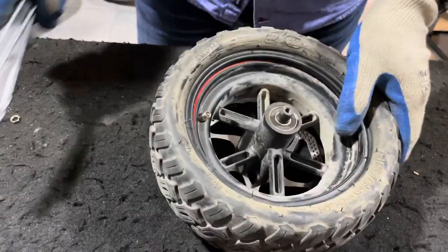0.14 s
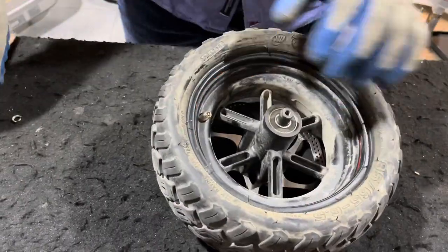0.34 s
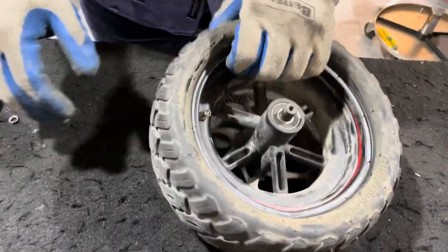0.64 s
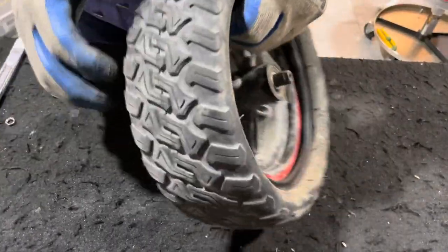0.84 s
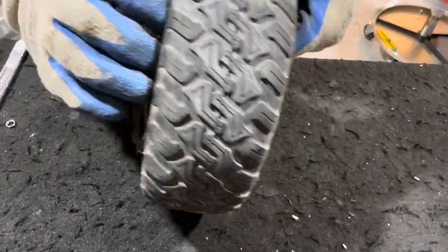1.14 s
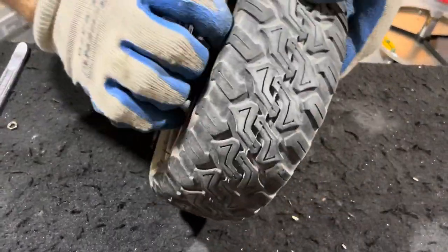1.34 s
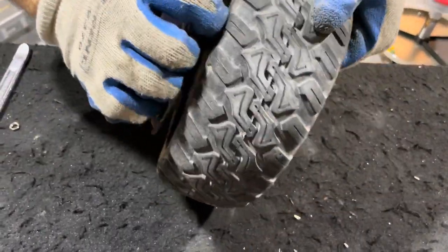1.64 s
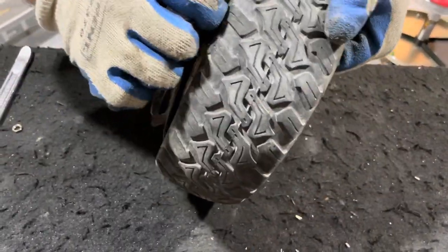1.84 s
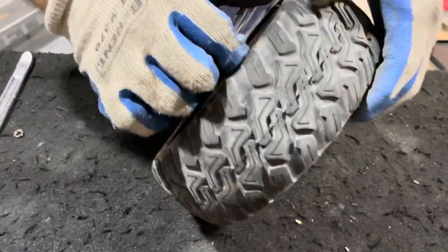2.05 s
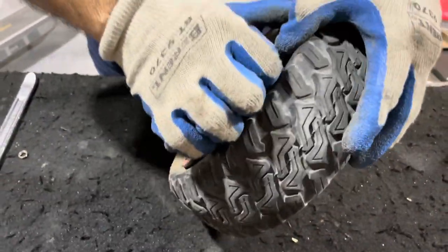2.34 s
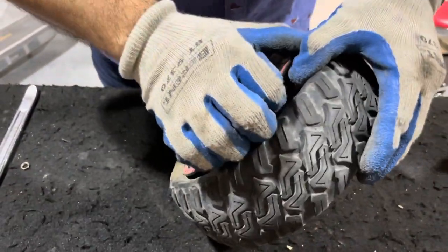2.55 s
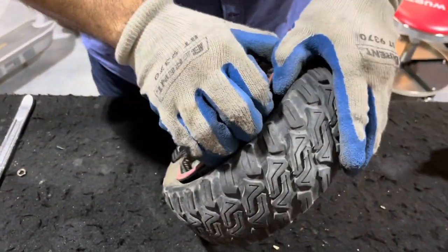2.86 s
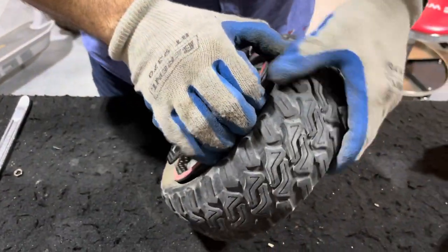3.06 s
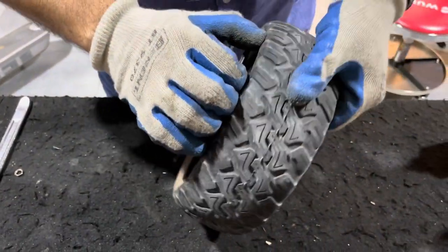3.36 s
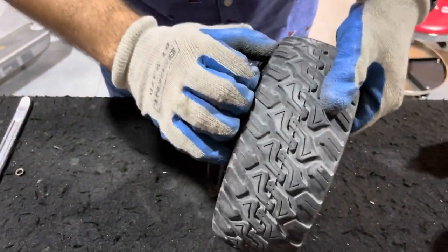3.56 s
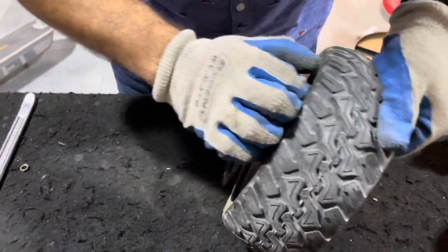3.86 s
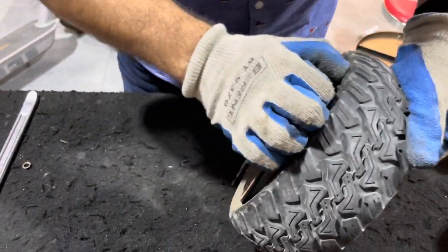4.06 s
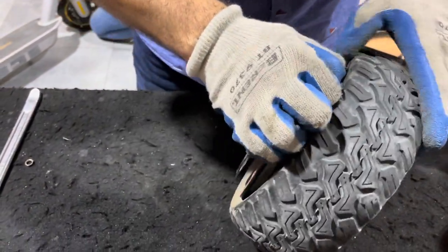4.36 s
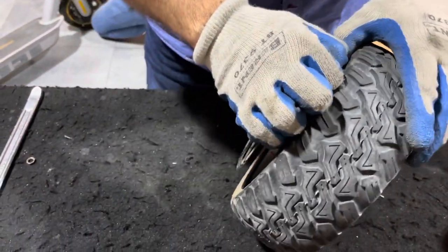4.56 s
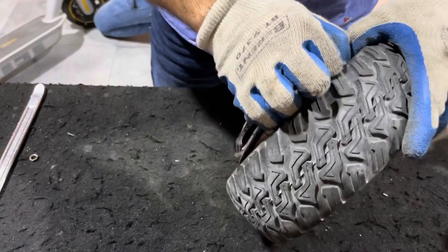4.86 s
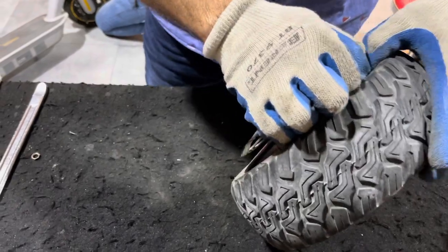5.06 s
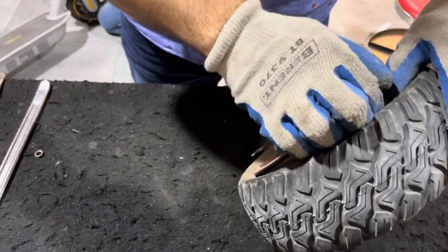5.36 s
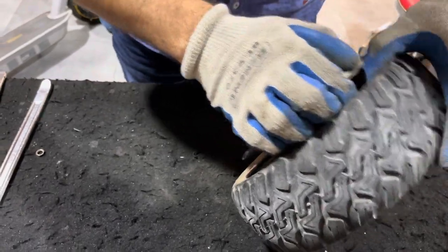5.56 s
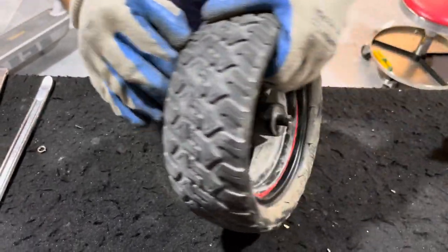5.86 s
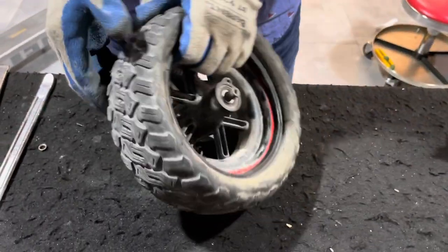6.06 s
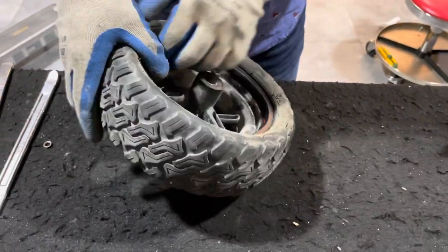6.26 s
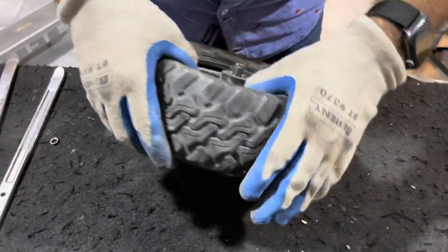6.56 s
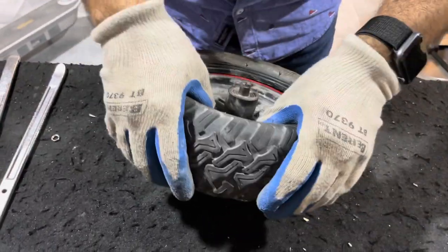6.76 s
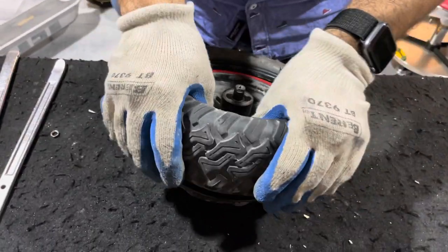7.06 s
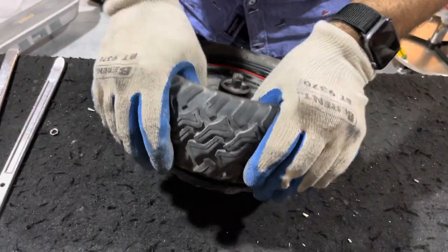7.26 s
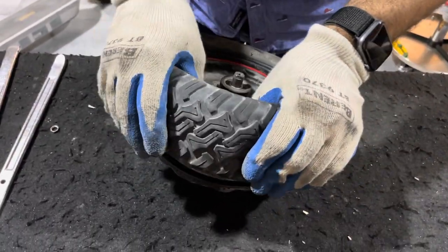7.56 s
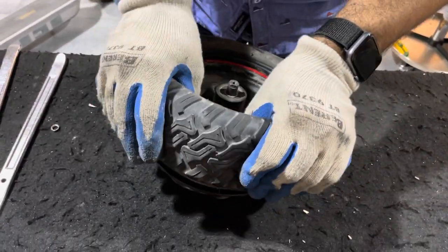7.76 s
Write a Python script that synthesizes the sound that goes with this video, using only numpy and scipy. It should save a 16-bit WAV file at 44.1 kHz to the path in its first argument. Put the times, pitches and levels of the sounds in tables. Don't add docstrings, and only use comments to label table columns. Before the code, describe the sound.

Close up at a workbench, metal tire levers tap lightly and land in a hard, ringing clatter within the first half second. Then a small tire is wrestled by gloved hands: faint rubbing, dry ticks, a knocking double pop, a weaker pop with a faint metallic ring. The last seconds bring muffled stand bumps, rubber creaks and squeaks, over dull room hum and short reverberation.

```python
import sys
import numpy as np
from scipy import signal
from scipy.fft import rfft, irfft, next_fast_len
from scipy.io import wavfile
from scipy.ndimage import uniform_filter1d, map_coordinates

SR = 44100
rng = np.random.default_rng(int(sys.argv[2]) if len(sys.argv) > 2 else 0)


def master(y):
    cut = np.clip(np.atleast_2d(y).T, -1, 1)
    pcm = np.round(cut * 32767)
    wavfile.write(sys.argv[1], SR, pcm.astype(np.int16))


def amplitude_ratio(level_db):
    exponent = np.asarray(level_db, float) / 20
    return 10 ** exponent


N = 348831

# t/s, level/dB
HUM_LEVEL = [(0, -49), (.13, -42.5), (.33, -44), (.48, -58), (.72, -42.5), (.86, -46.5), (1.05, -51.5),
             (5.7, -53), (7.91, -50.5)]
# f/Hz, level/dB
HUM_SPECTRUM = [(20, -16.5), (40, -5.5), (80, -2), (125, -6.5), (170, 1), (250, -11), (500, -15),
                (1000, -19), (2000, -30.5), (4000, -38.5), (8000, -48), (14000, -53.5)]
LEVER_HZ = [1860, 2993, 3047, 3133, 4543, 5490, 5717, 5857, 6212, 6330, 6446, 8118, 8225, 8410, 8516, 8602,
            9000, 9087, 10432, 10637, 11272, 11477, 12780, 12952, 13167, 14340, 14610, 15557]
# level/dB, T60/s
LEVER_MODES = [(-36, 1.8), (-27, 1.5), (-22, 1.8), (-14.5, 3.3), (-6, 0.9), (-14.5, 0.71), (-17.5, 1.12),
               (-24.5, 1.), (-6, 0.55), (-2, .45), (-14, 0.31), (2.5, 0.28), (-4, 0.65), (-14, 0.52),
               (-6, 0.8), (-16.5, .55), (-19.5, 1.2), (-21.5, 2.1), (-4.5, 0.5), (2, .5), (-14, 0.55),
               (-21, .7), (-20, 1.6), (-2, 0.45), (-16, .55), (-31, 0.46), (-24, .55), (-19, .62)]
# t/s, ring level/dB, crack level/dB, extra damping/(dB/s) by hand or mat, brightness/(dB/octave)
LEVER_CONTACTS = [(.001, -36.5, -29.5, 197.5, -1), (0.029, -39.5, -42, 201, -2.5),
                  (0.077, -50.5, -46.5, 69.5, -5), (0.1316, -44, -46.5, 297, -17),
                  (0.1466, -34.5, -26.5, 303, -14), (0.1845, -38, -43.5, 297.5, -8),
                  (0.2778, -43.5, -59.5, 102, -8), (0.3077, -26, -22, 300, -3),
                  (0.3324, -24, -32, 397.5, -0.5), (0.356, -15, -10.5, 499.5, -4),
                  (0.37, -18.5, -30, 400, 6.5), (0.385, -24.5, -20.5, 403.5, 3),
                  (0.394, -19.5, -34.5, 0, 1.3), (0.439, -22, -31.5, 142.5, 1.5),
                  (0.478, -28.5, -26, 208, 7.5)]
# f/Hz, level/dB
STRIKE_POINTS = [(3033, 13.5), (6370, 7.5), (13000, 8), (4540, 5), (6297, 9), (5400, 4), (6300, 1),
                 (8200, 4), (8200, 8.5), (6200, 4.5), (8400, 4.5), (8200, 1), (4540, -1.5), (6256, -1.5),
                 (8250, 2)]
# t/s, level/dB
GAIN_CONTROL = [(0, 5.5), (.385, 2), (.4, -2), (.49, 0), (.55, -5), (.76, 14), (1.5, 7.5), (1.6, -2.5)]
# t/s, length/s, level/dB
STEEL_SLIDES = [
    (0, 0.025, -29),
    (.149, 0.02, -38),
    (.311, 0.065, -27),
    (.358, 0.011, -28),
    (.47, 0.035, -58),
]
# t/s, level/dB, start f/Hz, T60/s, share through the stand (opposite in both ports, 0-1)
KNOCKS = [
    (0.355, -10.5, 240, 0.08, 0.02),
    (0.637, -30, 213, 0.099, 0.026),
    (1.572, -18, 420, 0.027, 0.086),
    (1.579, -13.5, 424, 0.013, 0.28),
    (3.269, -27, 348, 0.067, 0.62),
]
# t/s, level/dB
STAND_BUMPS = [(5.187, -39), (5.396, -49), (5.52, -43.5), (5.553, -34.5), (5.596, -40), (5.702, -48),
               (5.721, -41), (5.765, -36), (5.86, -43), (5.873, -41), (6.03, -44), (6.699, -45),
               (7.311, -39.5)]
# f/Hz, width/Hz, level/dB
BENCH_MODES = [(66, 21, -2), (148, 77, -2.5), (558, 79, -3), (1100, 340, -17)]
# f/Hz, T60/s
ROOM_DECAY = [(150, 0.05), (1000, 1), (4000, 0.67), (12000, 0.33)]
# t/s, length/s, level/dB
TREAD_DRAGS = [
    (.79, 0.037, -45),
    (1.9, 0.23, -58),
    (3.45, 0.44, -64),
    (4.7, 0.63, -59),
    (5.8, 0.76, -57),
    (6.55, .05, -53),
    (6.6, 2.6, -59),
]
# f/Hz, level/dB
DRAG_SPECTRUM = [(150, -24), (400, -2.5), (900, -7.5), (1800, -7.5), (3000, -10), (6000, -32.5)]
# t/s, peak level/dB, f/Hz
GRIT_TICKS = [(1.039, -50, 1590), (1.085, -65, 7000), (1.223, -54, 2500), (1.401, -48, 6100),
              (1.685, -53, 3070), (1.965, -48.5, 1770), (1.988, -49, 8000), (2.139, -42.5, 8990),
              (2.417, -53, 1453), (2.612, -50.5, 8980), (2.755, -58, 8700), (3.79, -58, 8100),
              (4.173, -51, 1853), (4.5412, -48.5, 1825), (5.04, -56, 1655), (5.159, -52.5, 1603),
              (5.289, -65.5, 7720), (5.65, -47, 1653), (5.875, -51, 12800), (6.12, -51, 1820),
              (6.713, -32.5, 2467), (6.716, -39, 4360), (7.094, -52, 6870), (7.278, -47.5, 7150),
              (7.555, -49, 8500)]
# t/s, length/s, swish level/dB, fizz level/dB
GLOVE_SLIPS = [(1.076, .02, -58, -73.5), (1.181, 0.89, -65.5, -67.5), (1.61, 0.11, -51.5, -86),
               (2.419, 0.049, -87, -80), (2.616, 0.044, -64, -76.5), (2.989, 0.076, -68, -74.5),
               (3.265, 0.082, -55, -67.5), (3.792, 0.49, -80.5, -68.5), (4.794, 0.019, -81.5, -79),
               (5.283, 0.072, -69.5, -83), (5.716, 0.1, -48.5, -71), (5.8, 0.13, -48, -76),
               (6.212, 0.18, -58, -69), (6.704, 0.11, -70, -71.5), (7.658, 0.09, -44, -68)]
# t/s, length/s, swish level/dB, fizz level/dB
GLOVE_RUBS = [(1.714, 0.25, -63, -69), (2.21, 0.025, -68.5, -62.5), (3.058, 0.011, -66, -64),
              (3.478, 0.036, -61.5, -65.5), (4.471, 0.018, -77, -71.5), (5.102, 0.079, -78, -71.5),
              (5.597, 0.072, -76.5, -64.5), (5.952, 0.1, -61.5, -91), (6.097, 0.073, -66.5, -65.5),
              (6.551, 0.17, -56.5, -68), (6.862, 0.13, -61, -87), (7.113, 0.23, -72.5, -75.5),
              (7.318, 0.14, -65.5, -79.5), (7.855, 0.15, -61, -74.5)]
# f/Hz, level/dB
SWISH_SPECTRUM = [(1200, -63), (2500, -2), (3700, -2.5), (4400, -3.5), (5250, 1), (6200, -5.5), (8000, -12),
                  (9500, -4), (11500, -53)]
# f/Hz, level/dB
FIZZ_SPECTRUM = [(1200, -5), (2500, 0), (5000, -4), (7500, -2.5), (10000, -1), (12500, -2), (14000, -20),
                 (16000, -17)]
# t/s, level/dB, slip length/s
FIRST_SNAP = [
    (1.5705, -19.5, 0.0046),
    (1.5775, -19.5, .003),
]
# f/Hz, width/Hz, level/dB
FIRST_RIM = [(588, 110, -6), (1176, 300, -7), (2667, 220, 0.5), (5060, 190, 3), (6430, 2300, -14.5),
             (12300, 1300, -23)]
# t/s, level/dB, slip length/s
SECOND_SNAP = [
    (3.2645, -24.5, 0.0036),
    (3.268, -24.5, 0.0034),
]
# f/Hz, width/Hz, level/dB
SECOND_RIM = [(504, 280, -8.5), (1420, 390, -6), (3100, 430, -14), (4360, 160, -2), (6080, 750, -11.5),
              (12400, 1200, -19.5)]
# f/Hz, level/dB, T60/s
WHEEL_MODES = [(4470, 0, .75), (5470, -1, .6), (6280, -8, .4), (6620, -5, .5)]
# t/s, length/s, f/Hz, level/dB
RUBBER_SQUEAKS = [(5.525, 0.066, 3640, -61.5), (5.562, 0.056, 3170, -57.5), (5.64, 0.042, 1317, -56.5),
                  (5.766, 0.076, 2450, -59), (6.126, 0.35, 2593, -64.5), (6.158, 0.058, 4200, -66.5),
                  (6.214, 0.069, 8000, -65), (6.234, 0.19, 3270, -59.5), (6.434, 0.038, 5070, -63),
                  (6.472, 0.071, 3180, -62), (6.506, 0.13, 2845, -59.5), (6.521, 0.093, 6080, -69),
                  (6.895, 0.23, 2696, -63), (7.411, 0.03, 2780, -57), (7.47, 0.055, 2566, -59.5)]
# t/s, length/s, f/Hz, level/dB
RUBBER_CHIRPS = [
    (4.453, 0.21, 3100, -65.5),
    (6.696, 0.081, 2730, -65),
    (7.147, 0.26, 3296, -58.5),
]
# t/s, length/s, start f/Hz, end f/Hz, level/dB
RUBBER_STRAINS = [
    (4.52, 0.22, 2200, 1584, -58.5),
    (5.315, .06, 2640, 2420, -57),
    (5.638, 0.057, 1800, 1670, -51),
    (5.705, 0.05, 2500, 2860, -46),
    (6, .05, 2000, 2150, -56),
    (6.238, 0.51, 3000, 2840, -48),
    (6.704, 0.045, 2700, 2500, -47),
    (7.197, 0.81, 2990, 2820, -53),
    (7.68, 0.22, 3280, 2730, -61),
]
# f/Hz, phase/rad
LEAD_CENTRE = [(0, 0), (690, -2.3), (1460, -2.4), (2410, 2.4), (2840, 2.7), (4220, 1.7), (4820, 3),
               (5600, 6.4), (6120, 6.9), (8300, 8.6), (9200, 9.42), (11300, 9.42), (13600, 12.57)]
# f/Hz, phase/rad
LEAD_LEVERS = [(0, 0), (780, -2.6), (1890, -4.3), (3190, -2.3), (4480, -4.7), (5500, -6.9), (6120, -5.8),
               (8100, -4.2), (9100, -3.7), (9700, -3.2), (10600, -3), (11400, -2.6), (12950, -1.5),
               (14300, 0)]
# f/Hz, level/dB
PORT_TILT = [(60, 2), (110, -1.5), (200, 2), (380, -1), (700, -2), (1290, -7.5), (2380, 2), (4400, -4.5),
             (8800, 0)]
# f/Hz, share (0-1)
PORT_SPREAD = [(40, .05), (200, .3), (1000, 0.9), (6000, 0.8), (8300, 0.06), (9000, 0)]


def along(points, hz):
    f, v = np.transpose(points)
    return np.interp(np.log(hz + 1), np.log(f + 1), v)


def curve(points):
    return np.interp(np.arange(N) / SR, *np.transpose(points))


def unit(x):
    return x / np.sqrt(np.mean(x ** 2) + 1e-20)


def filtered(x, response):
    m = next_fast_len(N + SR // 2)
    return irfft(rfft(x, m) * response(np.fft.rfftfreq(m, 1 / SR)), m)[..., :N]


def resonances(modes):
    def response(f):
        total = 0
        for k, (centre, width, db) in enumerate(modes):
            loss = 1j * f * width
            total = total + (-1) ** k * amplitude_ratio(db) * loss / (centre * centre - f * f + loss)
        return total
    return response


def leads(lead):
    def pair(hz):
        half = amplitude_ratio(along(PORT_TILT, hz) / 2) * np.exp(.5j * np.interp(hz, *np.transpose(lead)))
        return np.array([half, 1 / half])
    return pair


def ports(x, lead):
    return filtered(x, leads(lead))


def blend(noise, diffuse, spectrum=((0, 0),)):
    m = next_fast_len(N + SR // 2)
    hz, z = np.fft.rfftfreq(m, 1 / SR), rfft(noise, m)
    share = np.clip(diffuse * along(PORT_SPREAD, hz), 0, 1)
    pair = np.sqrt(1 - share) * leads(LEAD_CENTRE)(hz) * z[0] + np.sqrt(share) * z[1:]
    return irfft(amplitude_ratio(along(spectrum, hz)) * pair, m)[:, :N]


def add(track, s, sound):
    part = track[..., round(s * SR):][..., :sound.shape[-1]]
    part += sound[..., :part.shape[-1]]


def strokes(rows, rise_s, rise, sag_db, release_s):
    silent_db = -25.5
    t, power = np.arange(N) / SR, np.zeros(N)
    for s, length, db in rows:
        knots = s + np.array([-rise_s - rise * length, 0, length, length + release_s])
        at = slice(*np.clip((knots[[0, -1]] * SR).astype(int), 0, N))
        shape_db = np.interp(t[at], knots, [silent_db, 0, -sag_db, silent_db - sag_db])
        power[at] += amplitude_ratio(db + shape_db) ** 2
    return np.sqrt(power)


def rush(spectrum, diffuse, patchy_db, grain_db):
    grains = rng.standard_normal((3, N)) * amplitude_ratio(grain_db * rng.standard_normal(N))
    z = signal.stft(grains, nperseg=512)[2]
    field = uniform_filter1d(rng.standard_normal(z.shape[1:]), size=5, axis=0)
    field = uniform_filter1d(field, size=10, axis=1)
    noise = signal.istft(z * amplitude_ratio(patchy_db * unit(field)), nperseg=512)[1][:, :N]
    return unit(blend(noise, diffuse, spectrum))


def hum():
    return amplitude_ratio(curve(HUM_LEVEL) + 1.5) * rush(HUM_SPECTRUM, diffuse=.5, patchy_db=2.0, grain_db=1.0)


def levers():
    strike_octaves, grip_falls = 0.15, 0.28
    beat_hz, beat_depth = 9, .4
    detune = 5e-6
    bar, cracks, t = np.zeros(N), np.zeros(N), np.arange(int(1.4 * SR)) / SR
    hz = np.c_[LEVER_HZ]
    mode_db, t60 = np.transpose(LEVER_MODES)[:, :, None]
    for contact, (near_hz, near_db) in zip(LEVER_CONTACTS, STRIKE_POINTS):
        s, ring_db, crack_db, damping, bright = contact
        u = t[:int(SR * min(1.4, 110 / max(damping, 1)))]
        luck = rng.standard_normal((3, len(LEVER_MODES), 1))
        pitch = hz * (1 + detune * damping * luck[2])
        beat = 1 + beat_depth * (hz > 4000) * np.sin(2 * np.pi * beat_hz * luck[2] * u + 3 * luck[0])
        favour_db = near_db * np.exp(-.5 * (np.log2(hz / near_hz) / strike_octaves) ** 2)
        start_db = mode_db + favour_db + bright * np.log2(hz / 6000) + .008 * damping * luck[0]
        decay_db = 60 * u / t60 + damping * (6000 / hz) ** grip_falls * u
        ring = beat * amplitude_ratio(start_db - decay_db) * np.sin(2 * np.pi * pitch * u + 3 * luck[1])
        add(bar, s, amplitude_ratio(ring_db) * ring.sum(0) * (1 - np.exp(-u / 0.0019)))
        add(cracks, s, amplitude_ratio(crack_db + 24.5 - 60 * t[:900] / 0.004) * rng.standard_normal(900))

    damped = [(f, 60, level - f / 1500) for f, (level, _) in zip(LEVER_HZ, LEVER_MODES)]
    modes = resonances([(2700, 1400, -20), (7460, 1100, -30.5)] + damped)

    def steel_colour(f):
        return modes(f) * (1j * f / (1800 + 1j * f)) ** 2 / (1 + (1j * f / 9000)) ** 3

    scrape = unit(filtered(rng.standard_normal(N), steel_colour))
    scrape *= strokes(STEEL_SLIDES, .004, 0, sag_db=3.5, release_s=.07)
    return ports(bar * amplitude_ratio(curve(GAIN_CONTROL)) + scrape + filtered(cracks, steel_colour), LEAD_LEVERS)


def thuds():
    out, t = np.zeros((2, N)), np.arange(SR // 8) / SR
    bumps = [(s, db, 398, 0.061, 1) for s, db in STAND_BUMPS]
    for s, db, start_hz, t60, stand in KNOCKS + bumps:
        hz = 75 + start_hz * np.exp(-t / 0.0033)
        wave = amplitude_ratio(db - 60 * t / t60) * np.sin(2 * np.pi * np.cumsum(hz) / SR)
        wave *= 1 - np.exp(-t / 0.00089)
        turn = np.clip(stand, 0, 1) * np.pi / 2
        same, opposite = np.cos(turn), np.sin(turn)
        add(out, s, wave * np.array([[same + opposite], [same - opposite]]))
    return out


def bench():
    force, t = np.zeros(N), np.arange(SR // 8) / SR
    add(force, KNOCKS[0][0], amplitude_ratio(10 - 60 * t / 0.076) * rng.standard_normal(len(t)))
    return filtered(force, lambda hz: resonances(BENCH_MODES)(hz) / (1 + 1j * hz / 700) ** 2)


def room(x):
    hz, t, z = signal.stft(rng.standard_normal((3, SR // 2)), SR, nperseg=256)
    tail = signal.istft(z * amplitude_ratio(-60 * t / along(ROOM_DECAY, hz)[:, None]), SR, nperseg=256)[1]
    tail /= np.linalg.norm(tail[0])
    late = np.pad(x, (500, 0))[None]
    return blend(signal.fftconvolve(late, tail, axes=1)[:, :N], diffuse=0.9)


def drags():
    pull = strokes(TREAD_DRAGS, .2, 1.24, sag_db=5.5, release_s=.5)
    return amplitude_ratio(-6.5) * pull * rush(DRAG_SPECTRUM, diffuse=0.93, patchy_db=3.5, grain_db=4)


def ticks():
    out, t = np.zeros(N), np.arange(400) / SR
    for s, db, hz in GRIT_TICKS:
        tone = np.sin(2 * np.pi * hz * t) * amplitude_ratio(-60 * t * hz / 28)
        click = 0.22 * amplitude_ratio(-60 * t / 0.0045) * rng.standard_normal(400)
        add(out, s, amplitude_ratio(db + 3.0) * (tone + click))
    return out


def gloves():
    slips, rubs = np.array(GLOVE_SLIPS), np.array(GLOVE_RUBS)
    slip_rise_s, rub_rise = 0.025, 1.24
    swish = np.hypot(strokes(slips[:, :3], slip_rise_s, 0, sag_db=11, release_s=0.17),
                     strokes(rubs[:, :3], 0.082, rub_rise, sag_db=5.5, release_s=.15))
    fizz = np.hypot(strokes(slips[:, [0, 1, 3]], slip_rise_s, 0, sag_db=1.0, release_s=0.12),
                    strokes(rubs[:, [0, 1, 3]], 0.078, rub_rise, sag_db=2.5, release_s=0.079))
    out = amplitude_ratio(2.0) * swish * rush(SWISH_SPECTRUM, diffuse=0.63, patchy_db=5.0, grain_db=6.0)
    return out + amplitude_ratio(7) * fizz * rush(FIZZ_SPECTRUM, diffuse=.4, patchy_db=2.6, grain_db=3.5)


def snaps():
    def mass_limit(hz):
        return (13800 ** 2 / (13800 ** 2 - hz ** 2 + 1j * hz * 14000)) ** 2

    out, bare, t = np.zeros(N), np.zeros(N), np.arange(SR // 40) / SR
    for slips, rim in (FIRST_SNAP, FIRST_RIM), (SECOND_SNAP, SECOND_RIM):
        force = np.zeros(N)
        for s, db, length in slips:
            fade_db = 60 * np.maximum(t - length, 0) / 0.0082
            add(force, s, amplitude_ratio(db + 10 - fade_db) * rng.standard_normal(len(t)))
            add(force, s + 0.00019, amplitude_ratio(db + 29.0) * np.hanning(5))
            creep = np.linspace(.3, 1, 400) * rng.standard_normal(400)
            add(force, s - .009, amplitude_ratio(db - 1.0) * creep)
        rim_modes = resonances(rim)
        out += filtered(force, lambda hz: rim_modes(hz) * mass_limit(hz))
        bare += force
    return out, bare


def wheel():
    out, t = np.zeros(N), np.arange(SR // 2) / SR
    drift = np.cumsum(rng.standard_normal((len(WHEEL_MODES), len(t))), axis=1) * .1
    for (hz, db, t60), phase in zip(WHEEL_MODES, drift):
        add(
            out, SECOND_RING_S, amplitude_ratio(-52.5 + db - 60 * t / t60) * np.sin(2 * np.pi * hz * t + phase))
    return out


SECOND_RING_S = SECOND_SNAP[1][0]


def squeaks():
    out = np.zeros(N)
    for rows, sag in (RUBBER_SQUEAKS, 0.1), (RUBBER_CHIRPS, 3):
        for s, length, start_hz, db in rows:
            u = np.linspace(0, 1, int(length * SR))
            knots = rng.standard_normal((2, 120))
            wander = [map_coordinates(k, [u * min(length * 330, 116)]) for k in knots]
            turn = 2 * np.pi * np.cumsum(start_hz * 2 ** (-sag * length * u)) / SR
            tone = wander[0] * np.cos(turn) + wander[1] * np.sin(turn)
            add(out, s, amplitude_ratio(db + 5.0) * np.sin(np.pi * u ** 0.34) ** 1.1 * tone)
    return out


def strains():
    s, length, start_hz, end_hz, db = np.transpose(RUBBER_STRAINS)
    ends_s, ends_hz = np.c_[s, s + length].ravel(), np.c_[start_hz, end_hz].ravel()
    pitch_hz = np.interp(np.arange(N) / SR, ends_s, ends_hz)
    hz, t, z = signal.stft(rng.standard_normal(N), SR, nperseg=512)
    centre = pitch_hz[np.minimum((t * SR).astype(int), N - 1)]
    band = np.exp(-.5 * (np.log((hz[:, None] + 1) / centre) / 0.2) ** 2) / np.sqrt(centre)
    noise = unit(signal.istft(z * band, SR, nperseg=512)[1][:N])
    pull = strokes(np.c_[s, length, db], 0.023, 0, sag_db=9.0, release_s=0.12)
    return amplitude_ratio(-5.5) * pull * ports(noise, LEAD_CENTRE)


def scene():
    steel, knocks = levers(), thuds() + bench()
    snap, slip = snaps()
    small = ticks() + squeaks()
    wall = resonances([(2500, 5200, -27)])
    broad = filtered(slip, lambda hz: wall(hz) / (1 + 1j * hz / 9000) ** 2)
    echo = room(broad + amplitude_ratio(-8.0) * small + amplitude_ratio(-11) * steel[0] + amplitude_ratio(-9) * knocks[0])
    front = wheel() + amplitude_ratio(-13.5) * filtered(snap, lambda hz: 1 / (1 + (1j * hz / 9000)) ** 2)
    hands = drags() + gloves() + strains()
    return steel + knocks + ports(snap + small, LEAD_CENTRE) + front + echo + hands + hum()


def roll_off(x):
    return signal.sosfilt(signal.butter(12, 15900, fs=SR, output="sos"), x)


def record(dry):
    dry = filtered(dry, lambda hz: hz < 16000)
    mix = dry / (1 + np.abs(dry / .9) ** 6) ** (1 / 6)
    return roll_off(mix)


dry = scene()
out = record(dry)
master(out)
```